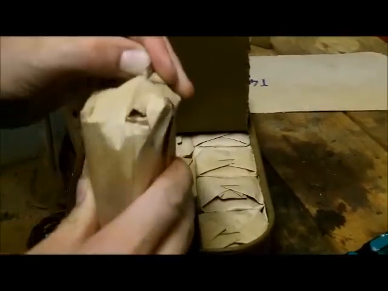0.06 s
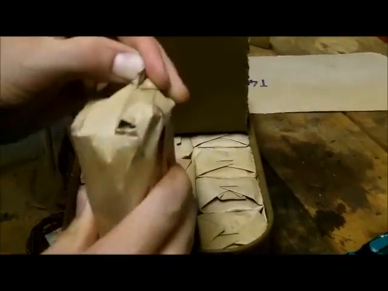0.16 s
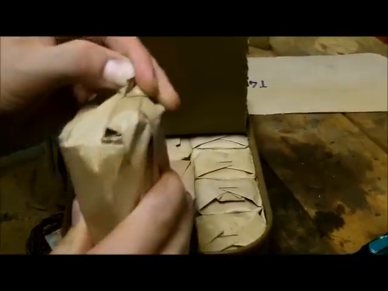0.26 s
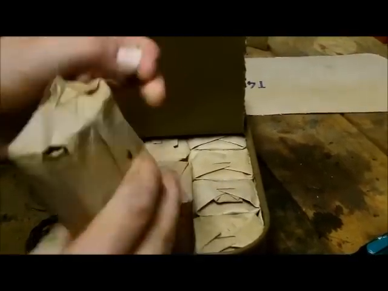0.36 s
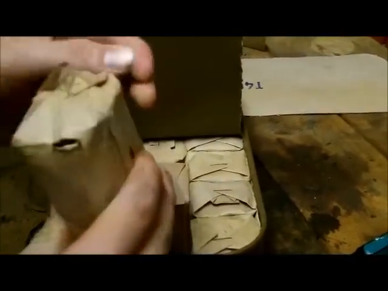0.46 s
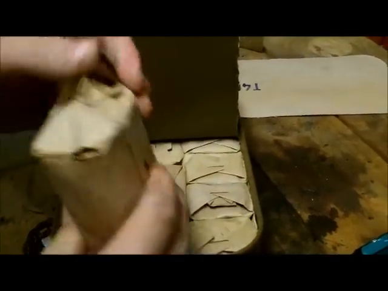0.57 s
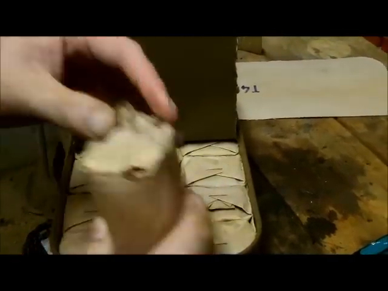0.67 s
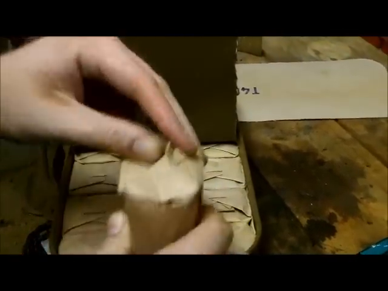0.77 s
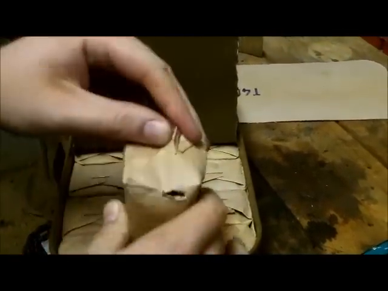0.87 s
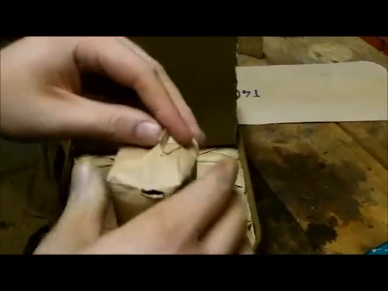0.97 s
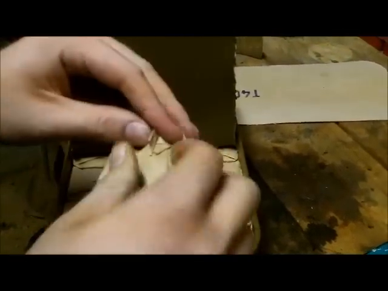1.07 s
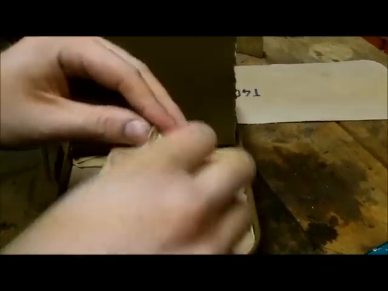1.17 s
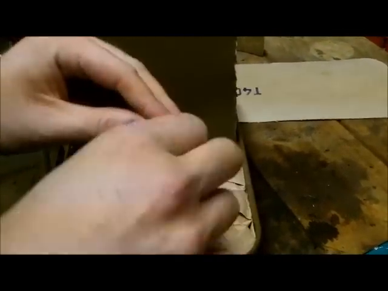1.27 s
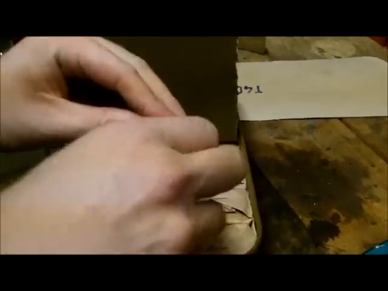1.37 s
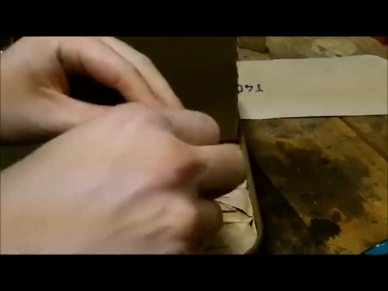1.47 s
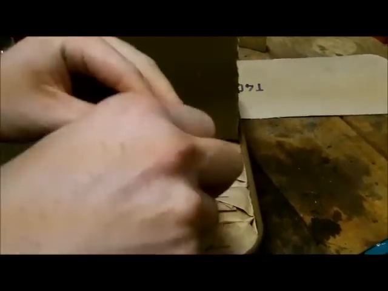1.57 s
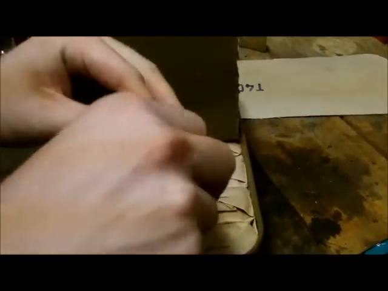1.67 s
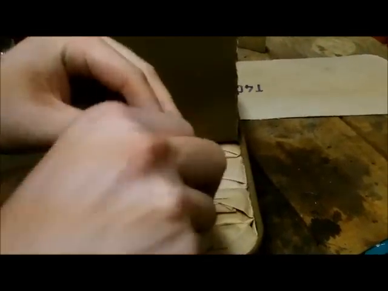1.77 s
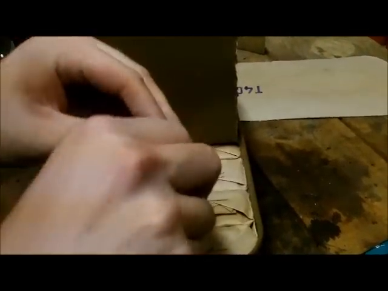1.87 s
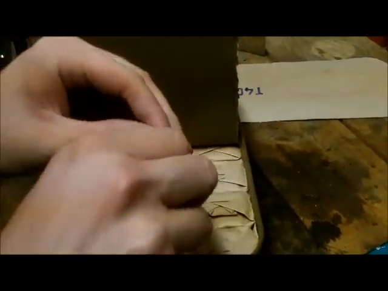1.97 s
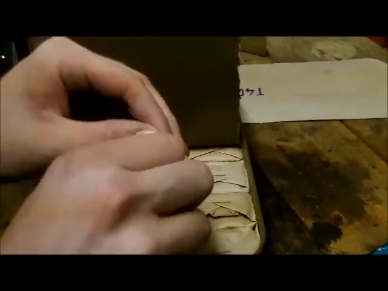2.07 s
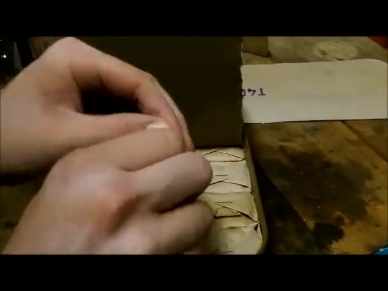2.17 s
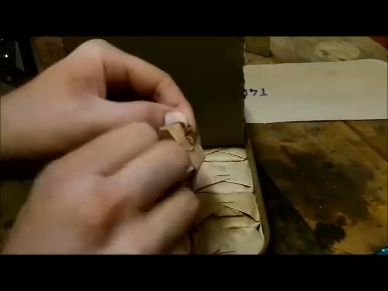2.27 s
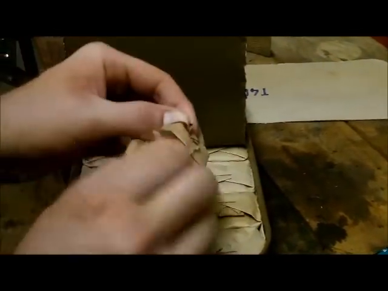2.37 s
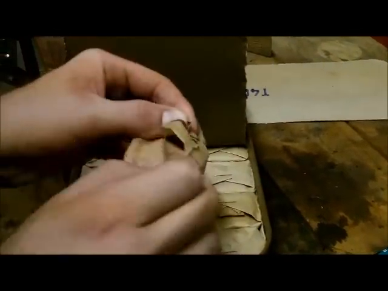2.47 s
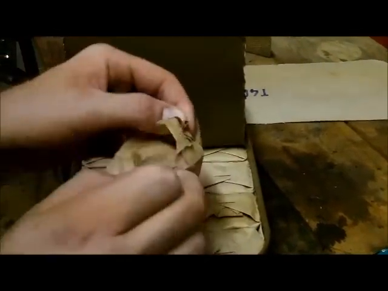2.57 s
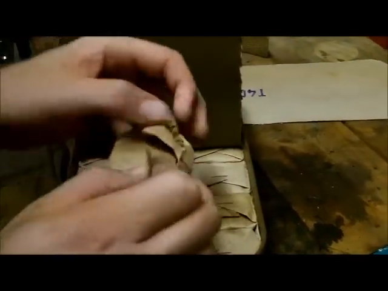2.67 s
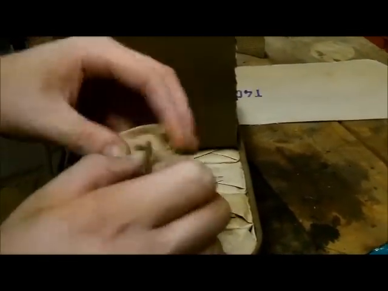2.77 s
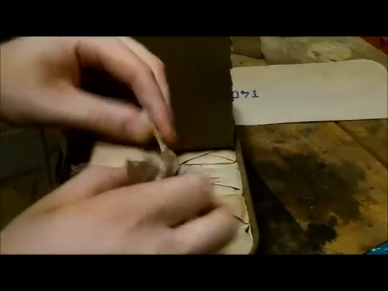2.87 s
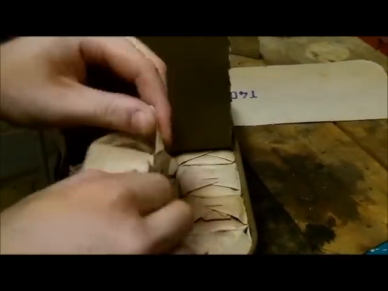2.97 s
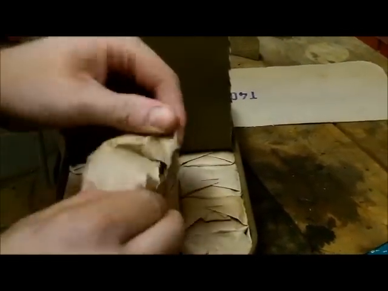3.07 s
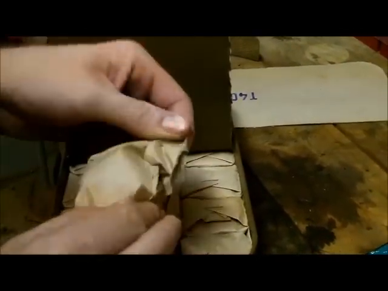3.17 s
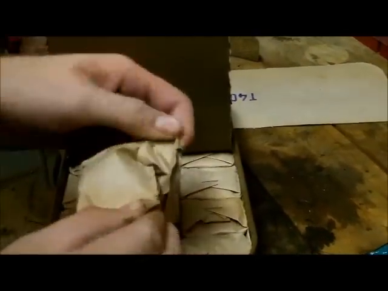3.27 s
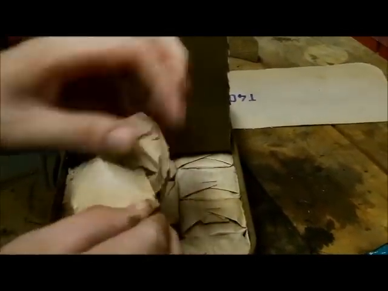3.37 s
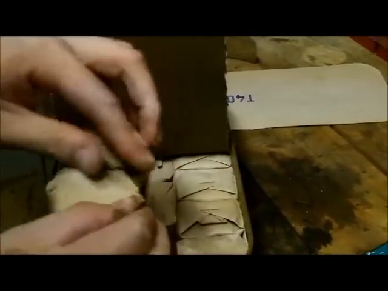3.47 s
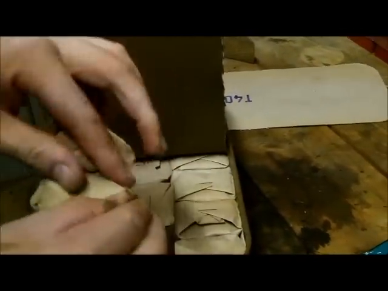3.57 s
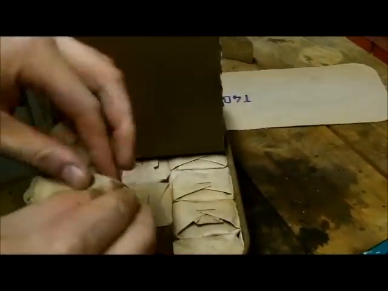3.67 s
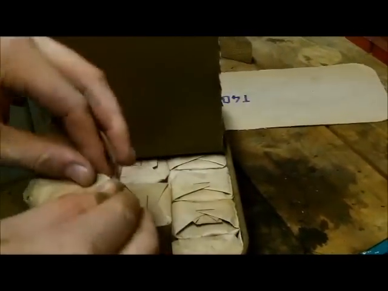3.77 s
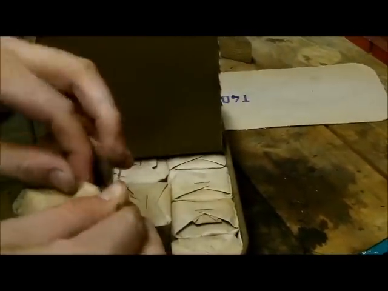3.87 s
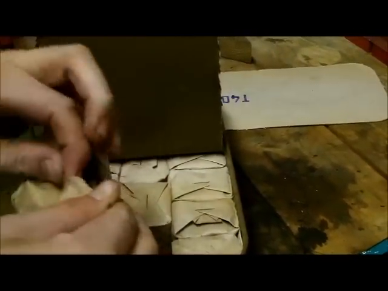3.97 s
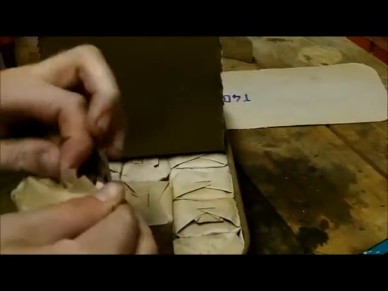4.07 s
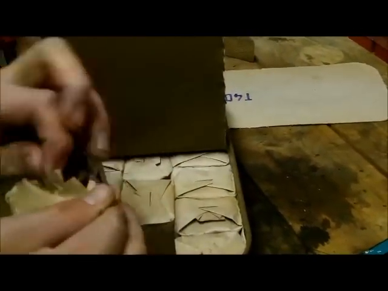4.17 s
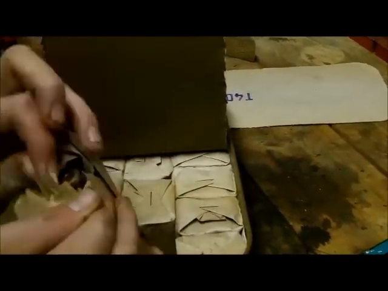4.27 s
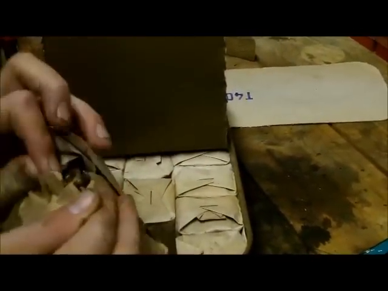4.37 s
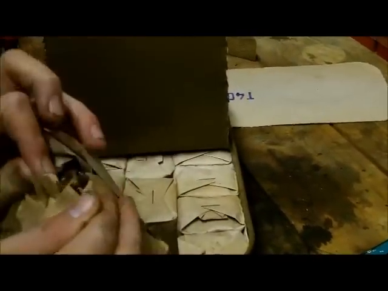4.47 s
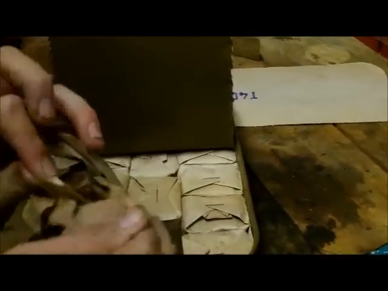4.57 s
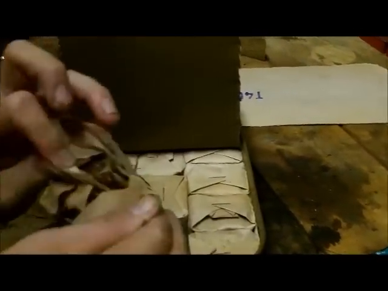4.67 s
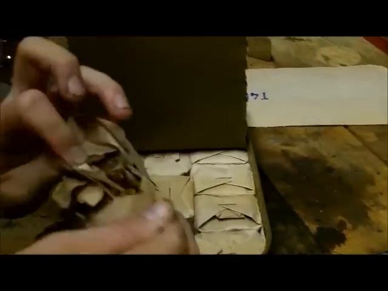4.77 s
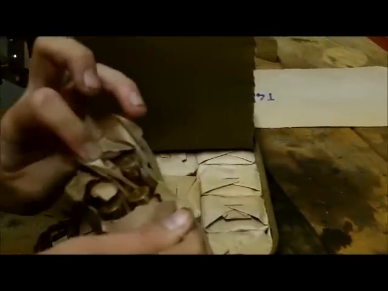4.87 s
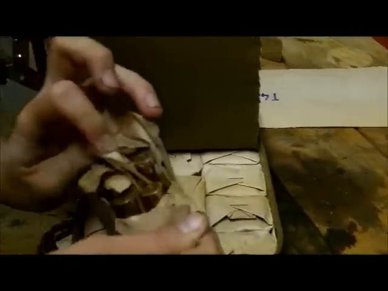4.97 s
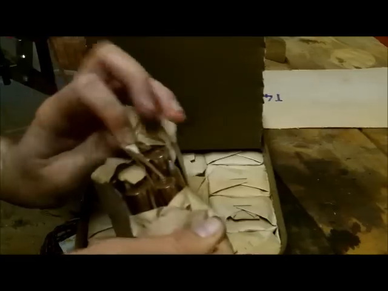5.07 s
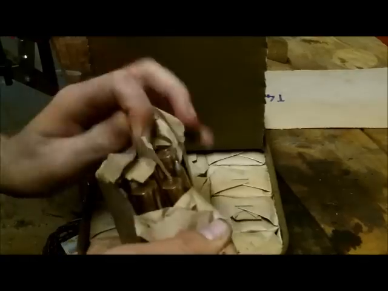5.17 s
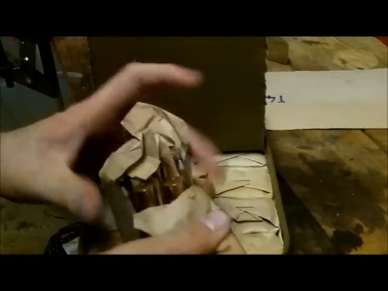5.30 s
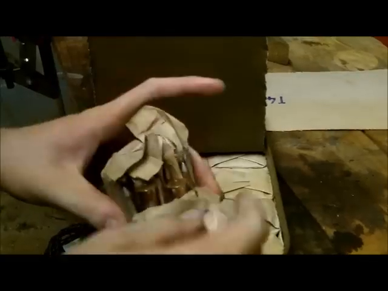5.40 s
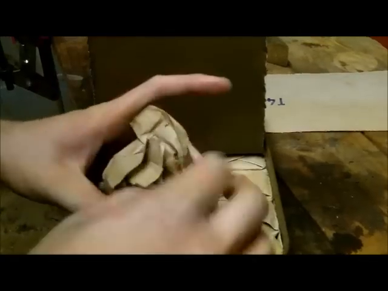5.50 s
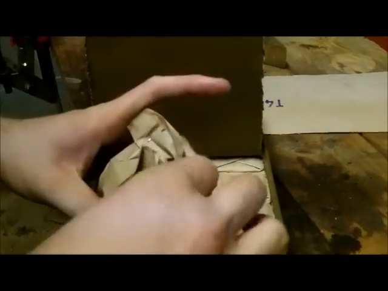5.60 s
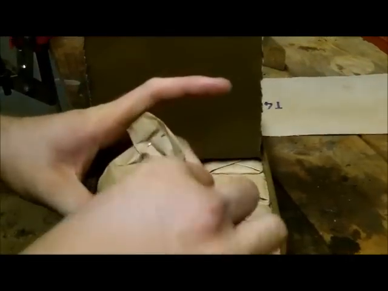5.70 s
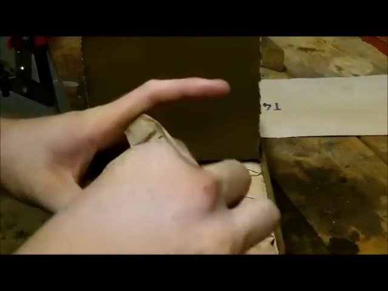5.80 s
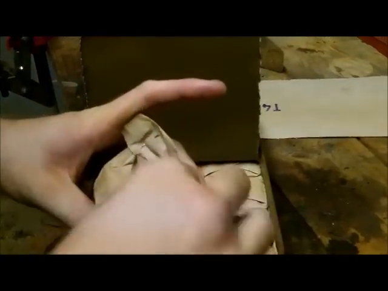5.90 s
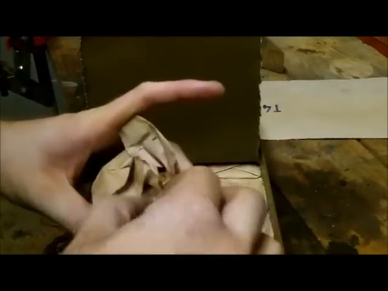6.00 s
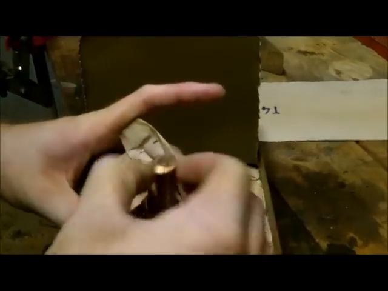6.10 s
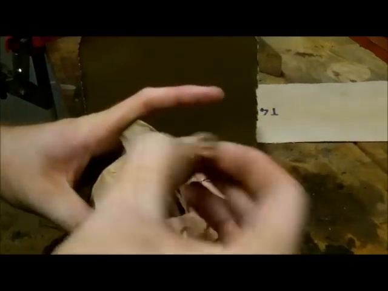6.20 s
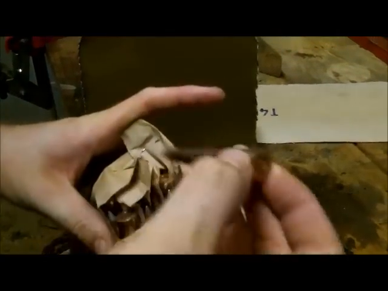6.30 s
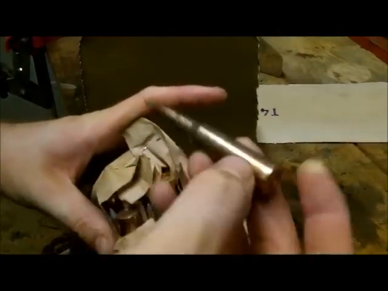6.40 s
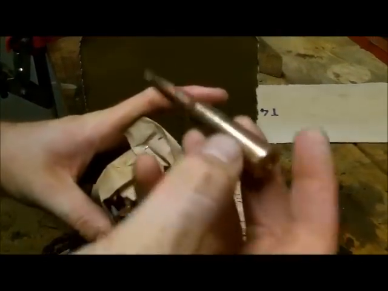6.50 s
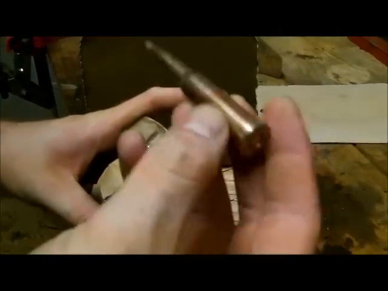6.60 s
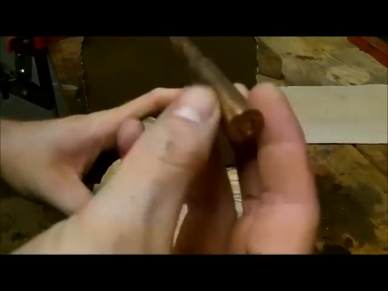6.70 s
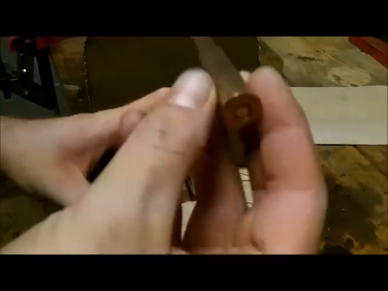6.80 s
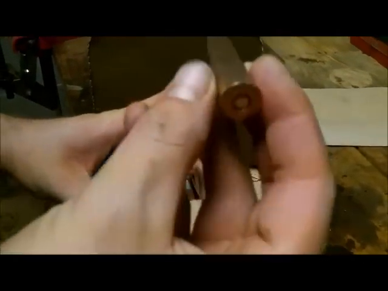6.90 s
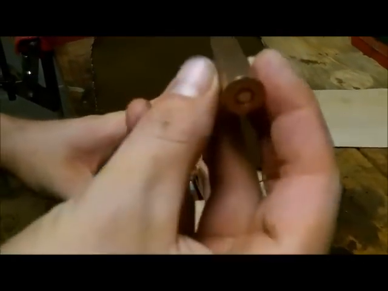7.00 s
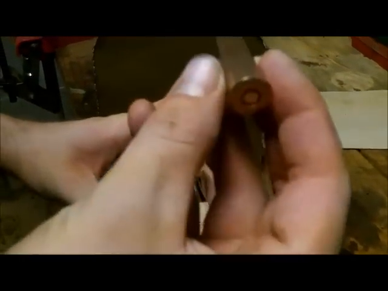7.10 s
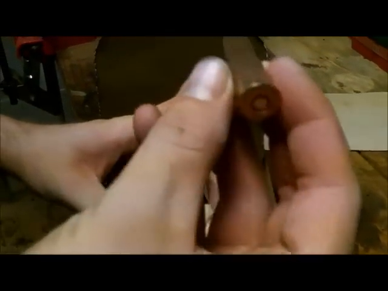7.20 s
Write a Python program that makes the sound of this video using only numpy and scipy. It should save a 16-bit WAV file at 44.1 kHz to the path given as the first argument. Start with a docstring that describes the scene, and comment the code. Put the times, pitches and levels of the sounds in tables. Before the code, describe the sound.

Thick wrapping paper crackles and crinkles loudly at close range, with hard snaps that slightly overload the microphone. Short tearing strokes and a small hollow pop mix with dull packet knocks. The activity grows denser, stops fairly suddenly, gives a brief softer rustle, and leaves quiet finger rubbing above low electrical hum and a thin whine, in a small workshop.

```python
"""Hands pick, tear and unfold a stiff brown paper packet of cartridges, close to a microphone over a workbench.
Creases snap as impulses that ring facet, sheet and packet; noise trains of crinkles and sliding fibres rustle.
A panel pops, skin rubs, the packet knocks dully, and near the end fingertips turn a freed round.
A faint hum, whine and noise floor lie underneath; the sharpest peaks overload the microphone."""
import sys
import numpy as np
from scipy import signal
from scipy.fft import rfft, irfft, next_fast_len
from scipy.io import wavfile
from scipy.ndimage import uniform_filter1d, map_coordinates

SR = 44100
rng = np.random.default_rng(int(sys.argv[2]) if len(sys.argv) > 2 else 0)


def store_wav(level_fs):
    """Save 16-bit WAV to argv[1]."""
    pcm = np.round(np.clip(np.atleast_2d(level_fs), -1, 1) * 32767)
    wavfile.write(sys.argv[1], SR, pcm.T.astype(np.int16))


N = 319725


def amp(db):
    """Decibel law: level to amplitude ratio."""
    return 10 ** (np.asarray(db) / 20)


def unit(x):
    """Normalisation to an RMS of one."""
    return x / np.sqrt(np.mean(x ** 2, axis=-1, keepdims=True) + 1e-20)


def curves(rows):
    """Linear interpolation: one value per sample for each column after the time."""
    s, *cols = np.transpose(rows)
    return [np.interp(np.arange(N) / SR, s, c) for c in cols]


def wobble(rate):
    """Random modulation, slow or rough according to rate: Gaussian knots, rate a second, joined by lines."""
    knots = rng.standard_normal(int(N * rate / SR) + 4)
    return map_coordinates(knots, [np.arange(N) * rate / SR], order=1)


def colour(x, points):
    """Minimum-phase filtering: a folded cepstrum gives a causal filter with the gains of (Hz, dB) points."""
    m = 2 * next_fast_len(x.shape[-1])
    hz, gain_db = np.transpose(points)
    bins_hz = np.fft.rfftfreq(m, 1 / SR)
    gain = amp(np.interp(np.log(bins_hz + 1), np.log(hz), gain_db))
    cepstrum = irfft(np.log(gain))
    cepstrum[1:m // 2] *= 2
    cepstrum[m // 2 + 1:] = 0
    return irfft(rfft(x, m) * np.exp(rfft(cepstrum)))[..., :x.shape[-1]]


def ring(x, hz, width_hz):
    """Damped resonance: a wider peak dies away sooner."""
    centre_hz = min(hz, SR / 3)
    q = hz / min(width_hz, SR / 4)
    return signal.lfilter(*signal.iirpeak(centre_hz, q, SR), x)


def ticks(rate, spread_db, largest=1.27):
    """Random impulse train: chance timing and sign, sizes spread exponentially in dB up to a cap."""
    size = amp(spread_db * np.minimum(rng.exponential(size=N), largest))
    return (rng.random(N) < rate / SR) * size * rng.choice([-1, 1], N)


HIT_S = 0.005  # the level of a snap or knock is its energy spread over this time
# Single crease snaps and faint handling ticks, loud to barely audible:
# start_s [s], level_db [dB], pitch_hz [Hz, of the facet]
SNAPS = [(0.0275, -17.5, 4900), (0.0754, -14.5, 2200), (0.0821, -14.5, 3810), (0.0856, -18, 2070),
         (0.2013, -28, 3590), (0.226, -11, 2170), (0.2265, -17.5, 4000), (0.2545, -31.5, 4230),
         (0.3575, -8.5, 3660), (0.3711, -32, 2500), (0.4376, -23.5, 2520), (0.5223, -30, 4340),
         (0.5307, -27.5, 4600), (0.58, -20, 4120), (0.9125, -31, 1900), (0.9831, -24, 3380),
         (1.0389, -12.5, 3470), (1.1281, -29.5, 3500), (1.1555, -27, 4070), (1.1756, -25, 3770),
         (1.2038, -24.5, 3620), (1.2125, -23, 3500), (1.438, -28, 3500), (1.4823, -12.5, 3760),
         (1.5924, -13, 1350), (1.6292, -28, 2460), (1.716, -21, 1710), (1.7308, -12.5, 4700),
         (1.7906, -25, 3810), (1.8053, -29, 4440), (1.8335, -27, 1990), (1.8646, -15, 2320),
         (2.0197, -12.5, 1660), (2.0344, -14.5, 1370), (2.038, -15.5, 5700), (2.0533, -17.5, 4000),
         (2.0738, -30, 3500), (2.1277, -27.5, 3920), (2.1432, -16, 5700), (2.2474, -22.5, 1480),
         (2.2798, -15.5, 4900), (2.2917, -13, 5130), (2.31, -16.5, 4120), (2.3228, -19.5, 4240),
         (2.3836, -30, 3330), (2.4143, -20.5, 1720), (2.5405, -12.5, 3120), (2.5672, -23.5, 3880),
         (2.5819, -20.5, 1300), (2.5949, -21, 2860), (2.6448, -12.5, 4080), (2.759, -25, 4200),
         (2.804, -19.5, 4170), (2.8056, -22.5, 1440), (2.8198, -28, 1520), (2.8524, -21, 4500),
         (2.9349, -11.5, 1636), (2.9743, -19.5, 4480), (2.9962, -21, 3800), (3.0101, -15, 4360),
         (3.074, -21.5, 3780), (3.1155, -17.5, 4300), (3.1196, -20, 4220), (3.127, -19, 5170),
         (3.1934, -12, 2700), (3.2365, -15, 3830), (3.3287, -11.5, 3700), (3.3301, -20.5, 1900),
         (3.3726, -20.5, 2760), (3.4163, -19, 3080), (3.46, -15, 2620), (3.6372, -20, 3940),
         (3.6512, -20, 4530), (3.7279, -14, 2490), (3.7567, -28, 3160), (3.7958, -15, 2830),
         (3.8579, -21, 2760), (3.876, -21, 2760), (3.9798, -15.5, 3400), (4.0115, -12.5, 4900),
         (4.0621, -24.5, 4570), (4.0753, -20, 1690), (4.091, -19, 2400), (4.157, -19.5, 2930),
         (4.2187, -15, 4200), (4.2815, -20.5, 4070), (4.2937, -30, 3970), (4.38, -23.5, 3300),
         (4.4351, -21.5, 3140), (4.4585, -23, 4300), (4.527, -22, 3130), (4.546, -23, 3480),
         (4.5667, -29.5, 3780), (4.6218, -14.5, 3200), (4.6261, -23, 3590), (4.6363, -16, 3520),
         (4.6435, -17, 2830), (4.6618, -14, 4470), (4.6662, -22, 3260), (4.8202, -28, 4300),
         (4.8342, -17.5, 5000), (4.8675, -13.5, 4860), (4.8942, -16.5, 2840), (4.9159, -17, 2440),
         (4.9883, -24, 4600), (5.0366, -25, 2580), (5.049, -18, 5500), (5.069, -17.5, 2960),
         (5.2128, -22.5, 1830), (5.2815, -18.5, 3500), (5.3474, -17.5, 4030), (5.3742, -26, 4630),
         (5.4103, -17.5, 2740), (5.4866, -14, 4100), (5.5948, -15.5, 3140), (5.6196, -18.5, 3500),
         (5.807, -39, 4170), (5.958, -41.5, 2900), (6.015, -34, 3520), (6.0445, -28.5, 4740),
         (6.0857, -34, 4350), (6.1317, -27, 4760), (6.1476, -26, 4200), (6.3247, -28.5, 2590),
         (6.441, -45.5, 4840), (6.548, -46.5, 4700), (6.915, -47, 4800)]


def snaps(creases, facet_width_hz=620, sheet_hz=6500, second_db=-8, chatter=0.21, chatter_s=0.0011,
          flutter_db=-27, flutter_s=0.021, hollow_db=-6, size=1024):
    """Impulse excitation: a flipping crease's kick and chatter ring the facet, its neighbour, sheet and packet."""
    out, t = np.zeros(N + size), np.arange(size) / SR
    body_db = grip_db()
    for start_s, level_db, pitch_hz in creases:
        start = round(start_s * SR)
        decay = np.exp(-t / chatter_s) + amp(flutter_db) * np.exp(-t / flutter_s)
        kick = chatter * rng.standard_normal(size) * decay
        kick[0] += 1
        whole = sheet(kick)
        facet = unit(ring(whole, pitch_hz, facet_width_hz))
        neighbour_hz = np.sqrt(pitch_hz * rng.uniform(370, 5530))
        neighbour = unit(ring(whole, neighbour_hz, facet_width_hz))
        # small, stiff facets and hard snaps crack crisper
        crisp = pitch_hz / sheet_hz * (unit(whole) + amp(level_db) * unit(kick))
        snap = unit(facet + amp(second_db) * neighbour + crisp)
        snap = unit(snap + amp(body_db[start] + hollow_db) * unit(hollow(kick)))
        out[start:][:size] += amp(level_db) * snap * np.sqrt(HIT_S * SR / size)
    return out[:N]


def further_creases(effort_db, above_db=-5, scatter_db=1.5, pitch_hz=3600, pitch_spread=0.3, count=170):
    """Random events in proportion to effort: scattered further creases, more and harder as the paper is worked."""
    draws = np.clip(rng.standard_normal((count, 2)), -2, 2)
    work = np.cumsum(amp(effort_db))
    at = np.searchsorted(work, work[-1] * rng.random(count))
    rows = []  # columns as in SNAPS
    for i, (a, b) in zip(at, draws):
        level_db = effort_db[i] + above_db + scatter_db * a
        rows.append((i / SR, level_db, pitch_hz * np.exp(pitch_spread * b)))
    return rows


ATTACK_S, RELEASE_S = 0.0081, 0.015  # time constants with which a stroke takes hold and lets go
STROKE_CRINKLES, STIR_CRINKLES = 0.36, 0.25  # power share of crinkles against sliding (0-1)
STIR_TAUT_DB = -3.5
# Fingers rub, pull or crush the paper, levels relative:
# start_s [s], length_s [s], level_db [dB], tautness_db [dB, treble of the taut sheet]
STROKES = [(0.422, .011, -19, -7.5), (0.653, .095, -31, -5.5), (0.712, .03, -26.5, 5), (0.8, .006, -27, 2),
           (0.871, .052, -23, -5.5), (1.012, .018, -24.5, -10.5), (1.17, .045, -32, -10),
           (1.28, .095, -32.5, -6), (1.437, 0.03, -34, -7), (1.587, 0.066, -30, -8),
           (1.696, .165, -33.5, -14), (2.278, .04, -28, 3), (2.32, .042, -24, -7),
           (2.596, 0.09, -29.5, 8.5), (2.755, .045, -30, -3), (2.898, .035, -23.5, -5.5),
           (2.95, .155, -31, -12), (3.118, .03, -22, 3), (3.162, 0.07, -29, 1), (3.398, .02, -29, -2),
           (3.515, .025, -28.5, -3), (3.634, .02, -29, -7), (3.75, 0.041, -29.5, -7),
           (3.792, 0.038, -25.5, -12), (3.898, .045, -31.5, -6), (3.955, 0.044, -28.5, 0),
           (4.107, .04, -21.5, -3), (4.254, .04, -30, 13), (4.313, .16, -28, 3.5), (4.416, .03, -26, -5),
           (4.636, .012, -19.5, -1), (4.661, .008, -19, -3), (4.683, .018, -26.5, 4),
           (4.776, .06, -27.5, 2.5), (4.891, .06, -23, 4), (5.05, .045, -26, 6), (5.108, .025, -21.5, 2.5),
           (5.2, .095, -29.5, -2), (5.446, .09, -29.5, -1), (5.559, 0.036, -25.5, -6),
           (6.041, .06, -34.5, -2), (6.145, .06, -31.5, 1), (6.245, .055, -35, 6)]
# Paper stirring in the hands between strokes: time_s [s], level_db [dB, relative]
STIRRING = [(0, -41), (0.6, -43.5), (1.7, -39), (1.96, -46), (2.1, -38.5), (2.7, -35.5), (3.3, -43),
            (4.5, -36.5), (5.58, -36), (5.85, -56.5), (6.0, -52), (6.03, -43), (6.28, -42.5), (6.4, -57.5),
            (7.0, -62), (7.25, -55.5)]


def effort(step=64):
    """Power addition of strokes and stirring: level (dB), crinkle share and tautness (dB) per sample."""
    t = np.arange(0, N, step) / SR
    start, length, level_db, taut_db = np.transpose(STROKES)[:, :, None]
    before = np.maximum(start - t, 0) / ATTACK_S
    after = np.maximum(t - start - length, 0) / RELEASE_S
    strokes = (amp(level_db) * np.exp(-np.minimum(before + after, 20))) ** 2
    stir = amp(np.interp(t, *np.transpose(STIRRING))) ** 2
    power = stir + strokes.sum(0)

    def blend(own, resting):
        """Power-weighted mean of the strokes' and the stirring's values."""
        return ((own * strokes).sum(0) + resting * stir) / power

    share = np.clip(blend(STROKE_CRINKLES, STIR_CRINKLES), 0, 1)
    return curves(np.transpose([t, 10 * np.log10(power), share, blend(taut_db, STIR_TAUT_DB)]))


def rustle(effort_db, share, tight_db, level_db=0.5, hollow_db=-1, taut_hz=3700, patchy_db=2.5):
    """Stick-slip and buckling noise through the sheet: taut paper is brighter, a gripped packet hollower."""
    slips = ticks(rate=13000, spread_db=-0.5)
    slide = unit(slips * amp(3.6 * wobble(260)))  # sliding fibres catch and let go
    force = np.sqrt(share) * crinkles() + np.sqrt(1 - share) * slide
    whole = unit(sheet(force))
    slack = signal.sosfiltfilt(signal.butter(2, taut_hz, fs=SR, output="sos"), whole)
    bright = amp(tight_db)
    tilted = (slack + bright * (whole - slack)) / np.sqrt((1 + bright ** 2) / 2)
    paper = tilted + amp(grip_db() + hollow_db) * unit(hollow(force))
    return amp(effort_db + level_db) * unit(patches(paper, patchy_db))


def crinkles(rate=700, clumping_db=3.5, low_hz=1800, high_hz=6800, facet_q=1.76, broad=0.28, count=12,
             spread_db=5.5, chatter_s=0.00035):
    """Clustered random excitation: small facets buckle in clumps, each chattering and ringing in its pitch band."""
    out = np.zeros(N)
    busy = amp(clumping_db * wobble(35))
    decay = np.exp(-1 / (chatter_s * SR))
    for hz in np.geomspace(low_hz, high_hz, count):
        hits = np.abs(ticks(busy * rate / count, spread_db))
        bursts = signal.lfilter([1], [1, -decay], hits)
        chatter = bursts * rng.standard_normal(N)
        out += ring(chatter, hz, hz / facet_q) + broad * chatter
    return unit(out)


def patches(x, depth_db, size=512, order=(7, 9)):
    """Time-varying resonance: folds open and close, so the spectrum shifts from moment to moment."""
    z = signal.stft(x, nperseg=size)[2]
    field = rng.standard_normal(z.shape)
    field = uniform_filter1d(field, order[0], 0)  # smooth over frequency
    field = uniform_filter1d(field, order[1], 1)  # smooth over time
    return signal.istft(z * amp(depth_db * field / field.std()), nperseg=size)[1][:N]


# The sheet's own voice: frequency_hz [Hz], gain_db [dB, relative]
PAPER_RESPONSE = [(150, -28.5), (800, -16), (1200, -12), (1480, -3.5), (1900, -1.5), (3000, -1),
                  (4000, 1.07), (5000, 0.5), (6500, -3.5), (10500, -12), (12000, -32.5), (14000, -96)]


def sheet(force):
    """Radiation response: the whole sheet colours whatever force drives it."""
    return colour(force, PAPER_RESPONSE)


# The packet in the hand: pitch_hz [Hz], width_hz [Hz, first of two filters], gain_db [dB, relative]
HOLLOW_MODES = [(443, 740, -12.5), (813, 493, 2)]


def hollow(force):
    """Modal summation: low packet resonances, alternating in sign."""
    out = 0
    for k, (hz, width, gain_db) in enumerate(HOLLOW_MODES):
        mode = ring(ring(force, hz, width), hz, width + hz)
        out = out + (-1) ** k * amp(gain_db) * mode
    return out


# How firmly the packet is gripped: time_s [s], hollowness_db [dB, relative]
GRIP = [(0, -19), (0.72, -15), (1.18, -6.5), (1.34, -14.5), (1.62, -11.5), (2.35, -13), (2.66, -15.5),
        (2.92, -10.5), (3.2, -17), (3.54, -8), (4.0, -21), (4.4, -13), (5.11, -22.5), (5.72, -9),
        (6.2, -15.5)]


def grip_db():
    """Coupling: the grip sets how strongly the packet's hollow answers."""
    return curves(GRIP)[0]


# A taut panel's modes: pitch_hz [Hz], level_db [dB, initial peak], t60_s [s]
PANEL_MODES = [(650, -30, 0.035), (1000, -22, 0.042), (1820, -16.5, 0.028)]


def pop(start_s=2.1802, click_db=-27):
    """Snap-through buckling: a stiff panel flips from hollow to bulging with a short pitched knock."""
    t = np.maximum(np.arange(N) / SR - start_s, 0)
    modes = sum(amp(db - 60 * t / t60) * np.sin(2 * np.pi * hz * t) for hz, db, t60 in PANEL_MODES)
    click = unit(sheet(rng.standard_normal(N)))
    return modes + (t > 0) * amp(click_db - 60 * t / 0.016) * click


# Dull knocks of the packet, and a low thud as a hard snap overloads the microphone:
# start_s [s], level_db [dB], pitch_hz [Hz]
KNOCKS = [(0.2258, -20.5, 627), (0.428, -27.5, 410), (0.912, -30, 480), (2.8036, -19, 550),
          (3.99, -25, 910), (4.01, -37, 172), (5.2143, -31.5, 744), (5.4107, -29.5, 654),
          (5.5955, -25.5, 770), (6.1316, -33.5, 640)]


def knocks(width=1.54, rattle=0.061, rattle_s=0.0038, size=2048):
    """Heavily damped impact: one push and a slight noisy rattle ring a broad, low resonance."""
    out, t = np.zeros(N + size), np.arange(size) / SR
    for start_s, level_db, hz in KNOCKS:
        push = (t == 0) + rattle * rng.standard_normal(size) * np.exp(-t / rattle_s)
        knock = ring(ring(push, hz, hz * width), hz, hz + hz * width)
        out[round(start_s * SR):][:size] += amp(level_db) * unit(knock) * np.sqrt(HIT_S * SR / size)
    return out[:N]


# A finger dragging on the packet: time_s [s], pitch_hz [Hz], level_db [dB]
RUB = [(5.6, 1080, -60), (5.64, 1050, -42), (5.685, 1000, -49), (5.705, 800, -52), (5.76, 776, -43.5),
       (5.8, 770, -68)]


def rub(roughness_hz=500):
    """Frictional narrow-band noise: skin slips over the paper with a low, rough, falling note."""
    hz, level_db = curves(RUB)
    phase = 2 * np.pi * np.cumsum(hz) / SR
    note = wobble(roughness_hz) * np.cos(phase) + wobble(roughness_hz) * np.sin(phase)
    return amp(level_db) * unit(note)


def turning(start_s=6.42, level_db=-60, hz=2850, width_hz=450, uneven_db=5):
    """Band-filtered friction noise: fingertips turn the freed round with a faint, fitful whisper."""
    whisper = ring(ring(rng.standard_normal(N), hz, width_hz), hz, width_hz)
    fitful = unit(whisper * amp(uneven_db * wobble(17)))
    return amp(level_db) * fitful * (np.arange(N) / SR > start_s)


def bench(x, near_db=-15, near_t60=0.018, room_db=-23, room_t60=1.0):
    """Diffuse reflection: quick scatter from hands, box and bench, then a faint small room."""
    t = np.arange(SR) / SR

    def tail(t60):
        """Exponentially decaying noise of unit energy, after a 2 ms gap."""
        return unit(rng.standard_normal(len(t)) * amp(-60 * t / t60) * (t > 0.002)) / np.sqrt(len(t))

    echoes = amp(near_db) * tail(near_t60) + amp(room_db) * tail(room_t60)
    return x + signal.fftconvolve(x, echoes)[:N]


# Steady noise: frequency_hz [Hz], gain_db [dB, relative]
FLOOR_SPECTRUM = [(25, 5), (40, -3.5), (100, -7), (400, -12.5), (1200, -19.5), (3000, -18), (7000, -26),
                  (15000, -32)]
# Mains hum and electric whine: pitch_hz [Hz], level_db [dB]
HUM_TONES = [(56, -58), (118, -57.5), (236, -67), (1470, -59.5), (3591, -62)]


def background(floor_db=-48.0, waver_rad=0.073):
    """Stationary noise and phase-modulated tones: rumble and hiss under unsteady hum and whine."""
    t = np.arange(N) / SR
    tones = 0
    for hz, level_db in HUM_TONES:
        phase = 2 * np.pi * hz * t + waver_rad * wobble(13)
        tones = tones + amp(level_db) * unit(np.sin(phase))
    return tones + amp(floor_db) * unit(colour(rng.standard_normal(N), FLOOR_SPECTRUM))


def scene():
    """Superposition: everything the hands do, heard over the bench and the steady background."""
    effort_db, share, tight_db = effort()
    rustling = rustle(effort_db, share, tight_db)
    creases = list(SNAPS) + further_creases(effort_db)
    handling = rustling + snaps(creases) + pop() + rub() + knocks() + turning()
    return (bench(handling) + background())[None]


def record(dry, notch_hz=7950, notch_width_hz=1600, bend=0.022, lower_limit=0.92, top_hz=15800):
    """Nonlinear transduction: lopsided bending and clipping, then a deep treble dip and a band limit."""
    heard = np.clip(dry + bend * dry ** 2, -lower_limit, 1)
    notch = signal.iirnotch(notch_hz, notch_hz / notch_width_hz, SR)
    heard = signal.lfilter(*notch, signal.lfilter(*notch, heard))
    m = next_fast_len(N + SR // 2)
    passed = np.fft.rfftfreq(m, 1 / SR) < top_hz
    return irfft(rfft(heard, m) * passed, m)[..., :N]


dry = scene()
out = record(dry)
store_wav(out)
```